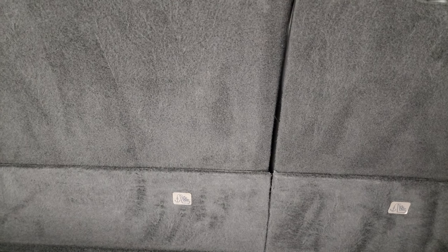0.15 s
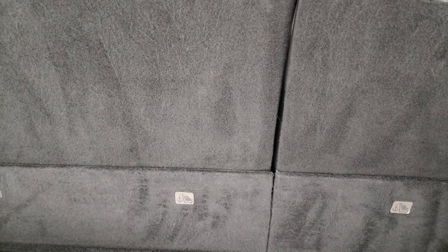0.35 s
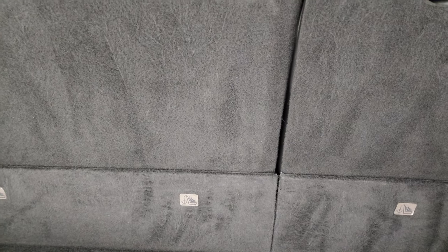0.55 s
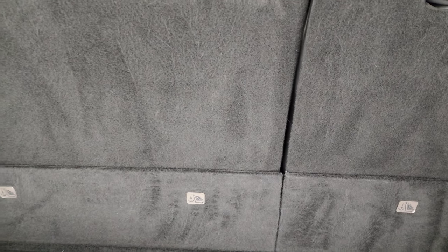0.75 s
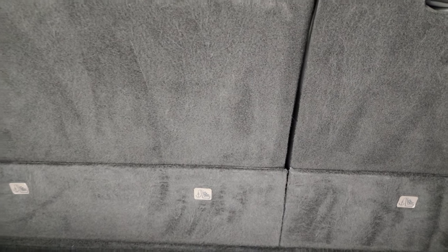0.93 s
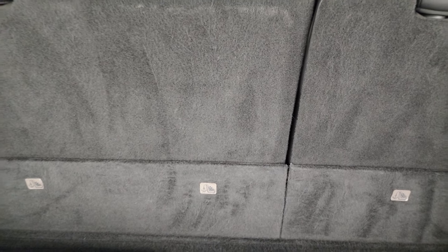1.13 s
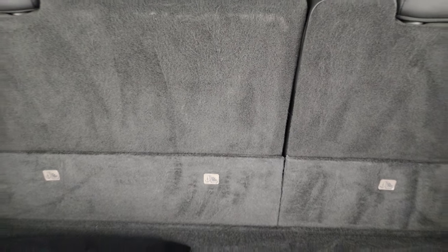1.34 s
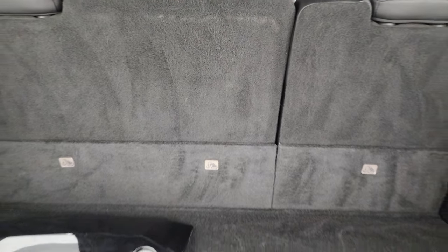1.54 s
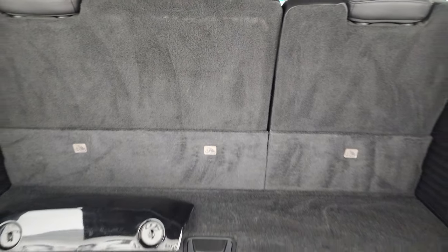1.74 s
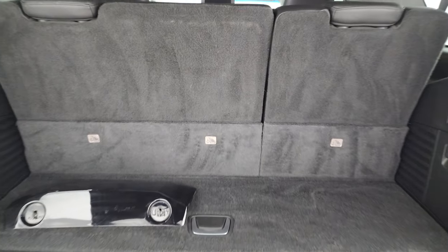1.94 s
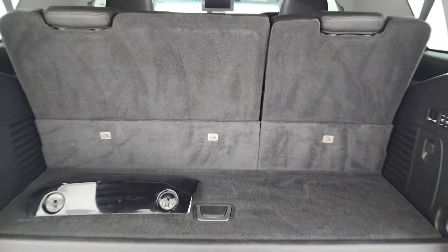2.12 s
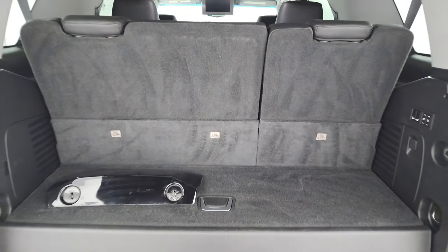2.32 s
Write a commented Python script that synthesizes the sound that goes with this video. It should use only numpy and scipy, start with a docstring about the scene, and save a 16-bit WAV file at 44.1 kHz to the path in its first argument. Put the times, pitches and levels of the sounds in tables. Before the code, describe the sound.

A short rising motor whine and clacks, then two car seatbacks clunk into their latches.

```python
"""A low rumble fades under a few small ticks. Two small geared motors spin up in turn inside the rear
seats of a car: teeth whine, brushes hiss, the drives clack against their stops and a pawl drops.
The two seatbacks latch upright with sharp clunks in a dull, reverberant wash; their frames knock softly.
The carpeted cargo area is dry; a large hall beyond the open tailgate adds a dull tail."""
import sys
import numpy as np
from scipy import signal
from scipy.fft import rfft, irfft
from scipy.io import wavfile
from scipy.ndimage import uniform_filter1d

SR = 44100
rng = np.random.default_rng(int(sys.argv[2]) if len(sys.argv) > 2 else 0)


def transcribe(signal):
    """Save signal, clipped to [-1, 1], as a 16-bit WAV file at the path in sys.argv[1]."""
    frames = np.atleast_2d(signal).T
    limited = np.clip(frames, -1, 1)
    pcm = np.round(limited * 32767).astype(np.int16)
    wavfile.write(sys.argv[1], SR, pcm)


N = 104737
TIME_S = np.arange(N) / SR

# noise spectra: (frequency [Hz], relative density [dB])
RUMBLE_SPECTRUM = [(20, -12), (35, -7), (80, 5.5), (130, -3.5), (200, -9), (315, -1), (600, -4),
                   (1100, -13), (2100, -28), (2700, -28), (3800, -39), (5200, -32), (6300, -53),
                   (7300, -50), (15000, -56)]
BACKGROUND_SPECTRUM = [(20, -26), (49, 2.5), (133, -18), (282, -15), (404, -9.5), (649, 2), (1070, -3),
                       (1700, -5.5), (2100, -35), (2700, -36), (5690, -30), (7500, -37.5), (15500, -31)]
TICK_SPECTRUM = [(500, -15), (1800, 4.5), (5000, 0.5), (7500, -5), (10000, -0.5), (13000, -15), (15500, -9)]
RASP_SPECTRUM = [(35, -49), (60, -18), (104, -8.5), (209, -31.5), (408, -2), (855, -2.5), (1200, -1),
                 (1600, -1), (2310, -18.5), (2710, -8.5), (4620, -20), (5430, -22.5), (6230, -23),
                 (8420, -48), (15000, -55.5)]
BRUSH_SPECTRUM = [(5500, -48), (6300, -20), (6650, 8.5), (7200, -9.5), (7750, -5), (8400, -37)]
FIZZ_SPECTRUM = [(8000, -32), (9000, 3), (9600, 5.5), (10100, -0.5), (10800, -12), (15000, -24)]
CLACK_SPECTRUM = [(47, -51), (80, -18), (234, -24), (627, -4), (1470, -1.5), (1750, -6.5), (3030, -12),
                  (4210, -16.5), (4800, -20), (5480, -24), (7950, -33.5), (8490, -47.5), (15000, -61)]
BUMP_SPECTRUM = [(40, -24), (90, 2), (180, -34), (330, 6), (620, 3), (1000, -15), (4000, -45)]
PAWL_SPECTRUM = [(59, -58), (100, -19), (836, -6.5), (1130, -2.5), (1590, -14), (1790, -22), (2190, -23),
                 (3260, -33), (6320, -33), (12000, -69), (15600, -100), (22000, -120)]
WASH_SPECTRUM = [(20, -36), (45, -16), (81, -4.5), (185, -9), (228, -4.5), (296, -3), (346, -10), (500, -8),
                 (1090, -6.5), (2490, -25), (4650, -30.5), (6200, -40.5), (7400, -51.5), (15000, -56.5)]
KNOCK_SPECTRUM = [(35, -42), (60, -13), (200, -4.5), (400, -1.5), (600, 2), (950, -8), (1820, -17.5),
                  (2490, -33), (3240, -26.5), (4730, -36.5), (7210, -54), (12000, -55)]
LATCH_1_SPECTRUM = [(24, -29), (40, -14), (129, -8.5), (218, -12), (535, 1.5), (704, -17), (838, -8),
                    (1380, -13.5), (1680, -18), (3220, -27), (4130, -32), (4570, -28.5), (7340, -49.5),
                    (15500, -61)]
LATCH_2_SPECTRUM = [(24, -43), (45, -25), (87, -6), (197, -9.5), (427, -1), (496, -0.5), (817, -8.5),
                    (903, -1), (1380, -14), (2010, -15), (3060, -24.5), (3470, -24), (5500, -29),
                    (7340, -46.5), (15500, -48)]
JANGLE_SPECTRUM = [(2000, -11), (5000, 1), (7500, 2.5), (9500, 8.5), (13000, -6), (15500, 1)]
HALL_SPECTRUM = [(60, -27), (250, -4.5), (500, 3.5), (1500, -5), (3000, -1), (5000, -5.5), (6400, -5.5),
                 (7400, -2), (15000, -46)]
# noise envelopes: (time [s], level [dB])
RUMBLE_ENVELOPE = [(0, -41.5), (.11, -44), (.17, -47.5), (0.249, -46.5), (.35, -53), (.7, -64),
                   (1.1, -74.5), (1.4, -88)]
RASP_ENVELOPE = [(.35, -62.5), (.39, -54.5), (.46, -45), (.53, -44.5), (.6, -38), (.66, -41.5), (.735, -42),
                 (.76, -52.5), (.83, -51.5), (.95, -63), (1.18, -76.5)]
BRUSH_ENVELOPE = [(.35, -106), (0.392, -87), (.43, -60.5), (.46, -62), (.49, -68), (.6, -56), (.74, -75),
                  (.8, -89)]
FIZZ_ENVELOPE = [(.46, -100), (.51, -80), (.56, -62.5), (.62, -69), (.73, -69), (.78, -83), (.83, -91.5)]
WASH_ENVELOPE = [(1.17, -89), (1.2, -56), (1.25, -41.5), (1.301, -44.5), (1.36, -44.5), (1.44, -40.5),
                 (1.5, -42), (1.65, -47), (1.8, -51.5), (1.92, -53), (1.98, -53), (2.1, -80)]
# motor run-ups: (time [s], tooth rate [Hz], levels of harmonics 1, 2, 3, 4 [dB])
MOTOR_1_RUN = [(0.385, 611, -49.5, -53, -76, -86), (0.405, 840, -56, -53, -95, -70),
               (0.425, 1032, -47, -64, -49.5, -85), (0.461, 1345, -41.5, -61, -81, -79),
               (0.473, 1433, -44, -43.5, -51, -98), (0.499, 1519, -53, -47.5, -56.5, -53),
               (0.541, 1601, -44, -48, -39.5, -50), (0.577, 1600, -65, -69.5, -44, -54),
               (0.6, 1590, -56, -50, -42.5, -49)]
MOTOR_2_RUN = [(0.515, 570.6, -45, -44.5, -51, -78), (0.533, 751.6, -48.5, -35.5, -74.5, -52),
               (0.559, 1021, -39, -48.5, -46.5, -73), (0.573, 1171, -42.5, -53, -66, -54),
               (0.593, 1342, -41, -40.5, -56, -57), (0.633, 1481, -34, -52, -50, -51.5),
               (0.655, 1515, -34, -44.5, -50, -46), (0.729, 1532, -32, -50, -51.5, -49),
               (0.74, 1516, -42, -44, -69, -44)]
# whine at full speed: (harmonic 5 [dB], harmonic 6 [dB])
TOP_HARMONICS_DB = [-73, -77]
# impacts: (time [s], level [dB])
TICK_HITS = [(.2045, -56), (.2145, -53.5), (.256, -67), (.275, -68.5), (1.819, -70), (1.893, -73)]
CLACK_HITS = [(.600, -27.5), (.6035, -26.5), (.624, -35.5), (.653, -33), (.7425, -26), (.747, -27.5),
              (.822, -40.5), (.907, -42), (1.02, -43.5)]
BUMP_HITS = [(.624, -37.5), (.655, -42.5)]
PAWL_HITS = [(.7895, -30.5), (.7935, -32.5)]
KNOCK_HITS = [(1.188, -37.5), (1.3155, -33), (1.549, -41.5), (1.599, -41), (1.691, -37), (1.712, -45.5),
              (1.759, -48.5), (1.812, -44), (1.888, -41.5), (1.94, -45.5)]
LATCH_1_HITS = [(1.2215, -19)]
LATCH_2_HITS = [(1.380, -22), (1.412, -27.5)]
JANGLE_HITS = [(1.382, -54.5), (1.412, -53)]
# modes of the struck parts: (frequency [Hz], relative level [dB], T60 [s])
CLACK_RING = [(575, -3.5, 0.031), (947, -11.5, 0.12), (1094, -11, 0.025), (1290, 0, .03),
              (2180, -17.5, 0.046)]
PAWL_RING = [(968, -9, 0.03), (1107, 1.5, .06), (1523, 0.5, 0.033), (2140, -5.5, 0.078)]
LATCH_1_RING = [(118.3, -15, 0.28), (238, -7.5, 0.046), (538, 5, .045), (577.4, 7.5, 0.026),
                (823, -0.5, 0.037), (1008, -12.5, 0.093), (4730, -36, .05)]
LATCH_2_RING = [(93.2, -11.5, 0.17), (273, 2.5, 0.041), (447, 1.5, 0.023), (566, 2, 0.044),
                (914.6, -4.5, 0.084), (2450, -24, 0.054)]
# hall reverberation: (frequency [Hz], T60 [s])
HALL_DECAY = [(100, 1), (700, 1.97), (1600, 2.55), (4000, 2.5), (8000, 1.6)]


def amp(db):
    """Decibels to gain."""
    return 10 ** (np.asarray(db) / 20)


def unit(x):
    """Scales to rms 1."""
    return x / np.sqrt(np.mean(x ** 2) + 1e-20)


def over_hz(table, hz):
    """Table lookup on a log-frequency axis."""
    table_hz, value = np.transpose(table)
    return np.interp(np.log(hz + 1), np.log(table_hz + 1), value)


def colour(x, spectrum):
    """Filters x by a spectrum table."""
    return irfft(rfft(x) * amp(over_hz(spectrum, np.fft.rfftfreq(N, 1 / SR))), N)


def wander(rate_hz):
    """Smooth random drift, rms 1."""
    hz = np.fft.rfftfreq(N, 1 / SR)
    return unit(irfft(rfft(rng.standard_normal(N)) * np.exp(-(hz / rate_hz) ** 2), N))


def grainy_noise(spectrum, envelope, lumps_db, lumps_hz):
    """Coloured noise in random lumps; silent once the envelope ends."""
    grains = rng.standard_normal(N) * amp(lumps_db * wander(lumps_hz))
    level_db = np.interp(TIME_S, *np.transpose(envelope), right=-np.inf)
    return unit(colour(grains, spectrum)) * amp(level_db)


def dying_noise(spectrum, decay, size):
    """Coloured noise, each band with its own T60."""
    t, hz = np.arange(size) / SR, np.fft.rfftfreq(size, 1 / SR)
    centres_hz = np.geomspace(50, 16000, 22)
    white = rfft(rng.standard_normal(size))
    gain = unit(amp(over_hz(spectrum, hz)))
    out = np.zeros(size)
    for centre_hz, pick in zip(centres_hz, np.eye(len(centres_hz))):
        band_gain = gain * np.interp(hz, centres_hz, pick)
        fade = amp(-60 * t / over_hz(decay, centre_hz))
        band = irfft(white * band_gain, size) * fade
        out += unit(band) * np.sqrt(np.mean(band_gain ** 2) * np.mean(fade ** 2))
    return out


def strikes(hits, spectrum, modes=(), *, rise_s, t60_s, noise_db=0):
    """Each hit rings any strong modes plus a noise cloud of small ones; t60_s: bass, mid, treble."""
    out, t = np.zeros(N), np.arange(SR // 2) / SR
    ring = 0
    for hz, db, mode_t60_s in modes:
        swell = np.minimum(t * hz, 1)  # one cycle
        ring += amp(db - 60 * t / mode_t60_s) * swell * np.sin(2 * np.pi * hz * t)
    decay = list(zip((100, 700, 8000), t60_s))
    for start_s, db in hits:
        cloud = amp(noise_db) * dying_noise(spectrum, decay, len(t))
        hit = amp(db) * np.minimum(t / rise_s, 1) * (ring + cloud)
        span = out[round(start_s * SR):][:len(t)]
        span += hit[:len(span)]
    return out


def rumble():
    """Low rumble with a dull hiss, dying away."""
    onset = np.minimum(TIME_S / .0019, 1)
    return onset * grainy_noise(RUMBLE_SPECTRUM, RUMBLE_ENVELOPE, lumps_db=1.23, lumps_hz=40)


def background():
    """Quiet, steady noise."""
    return amp(-62) * unit(colour(rng.standard_normal(N), BACKGROUND_SPECTRUM))


def ticks():
    """Small bright ticks, early and late."""
    return strikes(TICK_HITS, TICK_SPECTRUM, rise_s=.00037, t60_s=(.02, .063, .048), noise_db=3.5)


def drive_friction():
    """Gears and brushes rasp and fizz; brush hiss excites two housing resonances."""
    rasp = grainy_noise(RASP_SPECTRUM, RASP_ENVELOPE, lumps_db=2, lumps_hz=396)
    hiss = grainy_noise(BRUSH_SPECTRUM, BRUSH_ENVELOPE, lumps_db=4, lumps_hz=150)
    fizz = grainy_noise(FIZZ_SPECTRUM, FIZZ_ENVELOPE, lumps_db=1.5, lumps_hz=300)
    return rasp + hiss + fizz


def motor_whine(run):
    """Gear teeth mesh faster and more evenly on spin-up; each harmonic flutters with the load."""
    full_speed_hz, bright_from_hz, flutter_hz = 1610, 1490, 146.6
    teeth, wobble_rad, edge_s = 9, .06, .0026
    times_s, rates_hz, *columns_db = np.transpose(run)
    tooth_hz = uniform_filter1d(np.interp(TIME_S, times_s, rates_hz), size=500)
    slowness = np.maximum(1 - tooth_hz / full_speed_hz, 0)
    jitter = (.0025 + .0393 * slowness) * wander(flutter_hz)
    phase = 2 * np.pi * np.cumsum(tooth_hz * (1 + jitter)) / SR
    phase += wobble_rad * np.sin(phase / teeth)  # off-centre gear
    *lower_db, fourth_db = [np.interp(TIME_S, times_s, db) for db in columns_db]
    dull_db = .12 * np.maximum(bright_from_hz - tooth_hz, 0)  # harmonics 4-6 need near full speed
    harmonics_db = lower_db + [db - dull_db for db in [fourth_db, *TOP_HARMONICS_DB]]
    flutter_db = 1.1 + 7.5 * slowness
    whine = sum(amp(db + flutter_db * wander(flutter_hz)) * np.sin(k * phase)
                for k, db in enumerate(harmonics_db, 1))
    excess_db = flutter_db ** 2 * np.log(10) / 20  # mean power added by flutter
    running = np.clip(np.minimum(TIME_S - times_s[0], times_s[-1] - TIME_S) / edge_s + 1, 0, 1)
    return np.sqrt(2) * amp(1 - excess_db) * running * whine


def stop_clacks():
    """The mechanisms hit their stops."""
    return strikes(CLACK_HITS, CLACK_SPECTRUM, CLACK_RING,
                   rise_s=.0019, t60_s=(.055, .039, .034), noise_db=1)


def frame_bumps():
    """The loaded mechanism bumps the seat frame."""
    return strikes(BUMP_HITS, BUMP_SPECTRUM, rise_s=.0021, t60_s=(.13, .049, .04), noise_db=6)


def pawl_drop():
    """A pawl lands with two quick hits."""
    return strikes(PAWL_HITS, PAWL_SPECTRUM, PAWL_RING, rise_s=.0035, t60_s=(.042, .051, .027))


def latch_wash():
    """A dense, dull, reverberant wash swells around the latch clunks and dies away."""
    return grainy_noise(WASH_SPECTRUM, WASH_ENVELOPE, lumps_db=.8, lumps_hz=60)


def frame_knocks():
    """The seat frames knock softly."""
    return strikes(KNOCK_HITS, KNOCK_SPECTRUM, rise_s=.0012, t60_s=(.1, .16, .14))


def latches():
    """Two seatbacks strike their latches; the second rebounds."""
    first = strikes(LATCH_1_HITS, LATCH_1_SPECTRUM, LATCH_1_RING,
                    rise_s=.0042, t60_s=(.082, .065, .15), noise_db=-.5)
    second = strikes(LATCH_2_HITS, LATCH_2_SPECTRUM, LATCH_2_RING,
                     rise_s=.0021, t60_s=(.11, .11, .097), noise_db=2)
    return first + second


def jangle():
    """Loose metal parts shake after the second latch."""
    return strikes(JANGLE_HITS, JANGLE_SPECTRUM, rise_s=.001, t60_s=(.046, .1, .18), noise_db=-.5)


def space(x, hall_db, cabin_db=-14.5, cabin_t60_s=.095):
    """Adds short cargo-area reflections and the hall's long dull tail."""
    t = np.arange(2 * SR) / SR
    hall = dying_noise(HALL_SPECTRUM, HALL_DECAY, len(t)) * np.minimum(t / .013, 1)
    cabin = rng.standard_normal(len(t)) * amp(-60 * t / cabin_t60_s) * (t > .004)
    response = amp(hall_db) * hall / np.linalg.norm(hall) + amp(cabin_db) * cabin / np.linalg.norm(cabin)
    return x + signal.fftconvolve(x, response)[:N]


def scene():
    """Mono mix; rumble, background and wash bypass space()."""
    whine = space(motor_whine(MOTOR_1_RUN) + motor_whine(MOTOR_2_RUN), hall_db=-20)
    mechanism = drive_friction() + stop_clacks() + frame_bumps() + pawl_drop()
    seats = latches() + frame_knocks() + ticks() + jangle()
    beds = latch_wash() + rumble() + background()
    return (whine + space(mechanism + seats, hall_db=-18.5) + beds)[None]


def record(dry):
    """Low cut and band limit."""
    low_cut_hz, cutoff_hz = 45, 15900
    thinned = signal.sosfilt(signal.butter(2, low_cut_hz, "high", fs=SR, output="sos"), dry)
    lowpass = signal.firwin(511, cutoff_hz, window=("kaiser", 9), fs=SR)
    return signal.oaconvolve(thinned, lowpass[None], "same")


dry = scene()
out = record(dry)
transcribe(out)
```